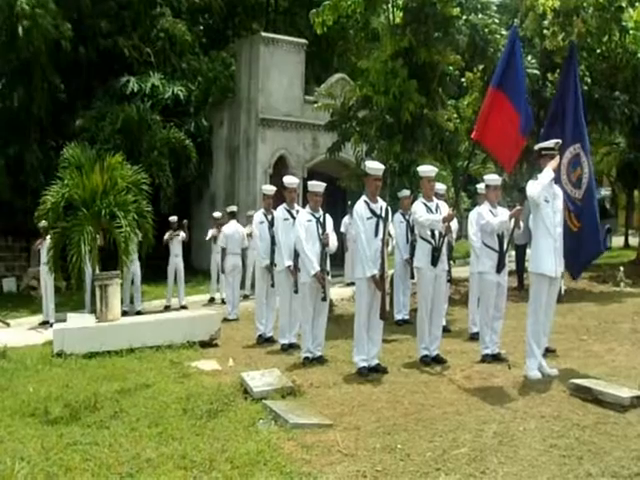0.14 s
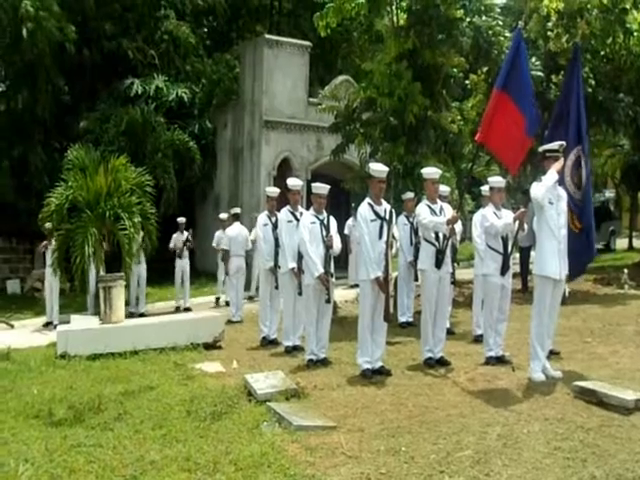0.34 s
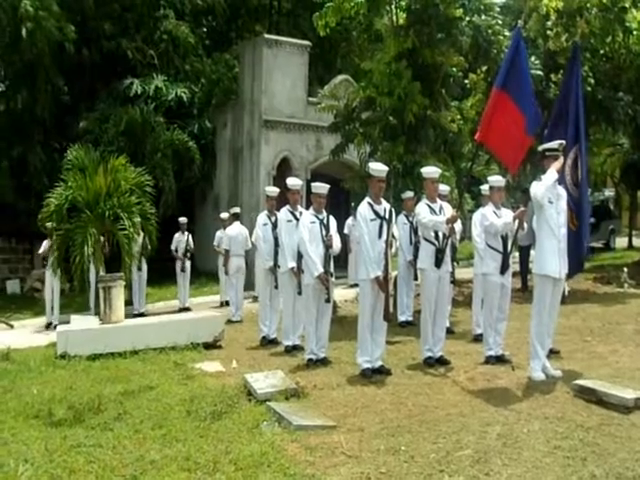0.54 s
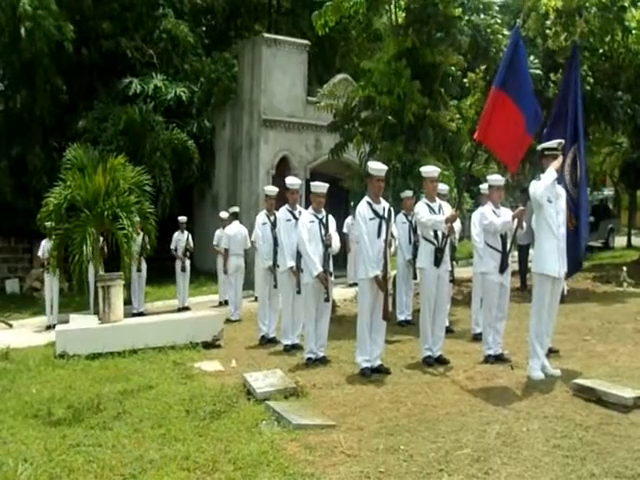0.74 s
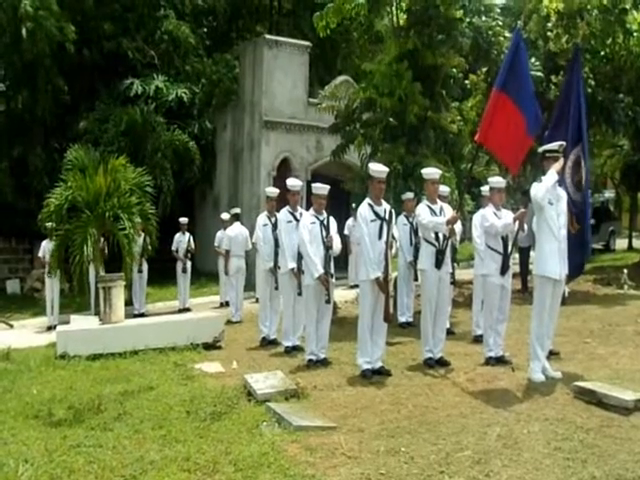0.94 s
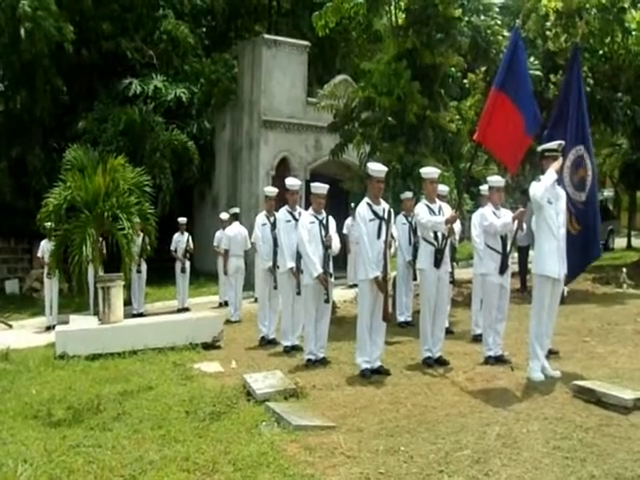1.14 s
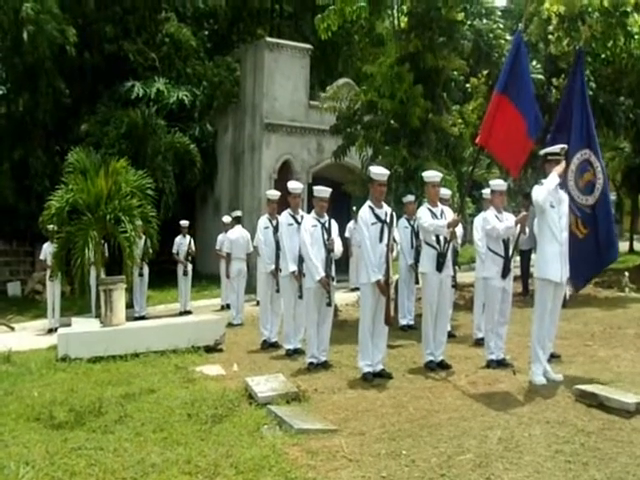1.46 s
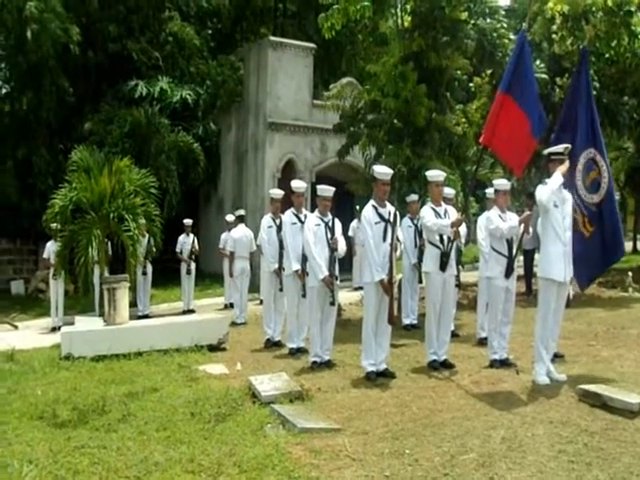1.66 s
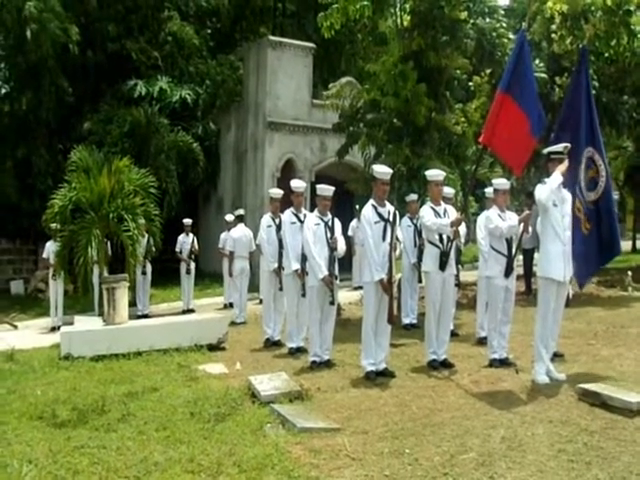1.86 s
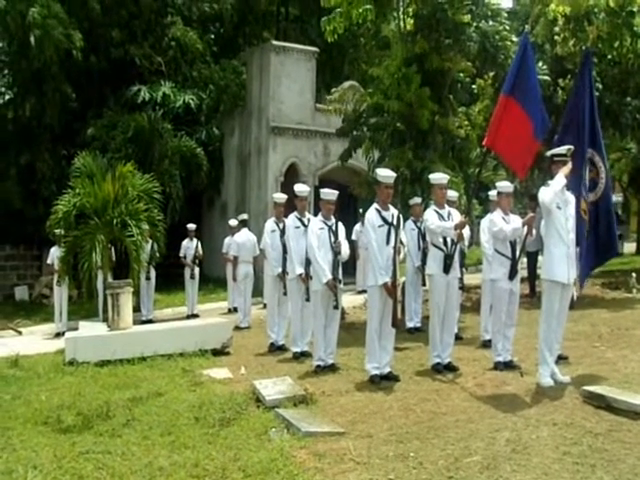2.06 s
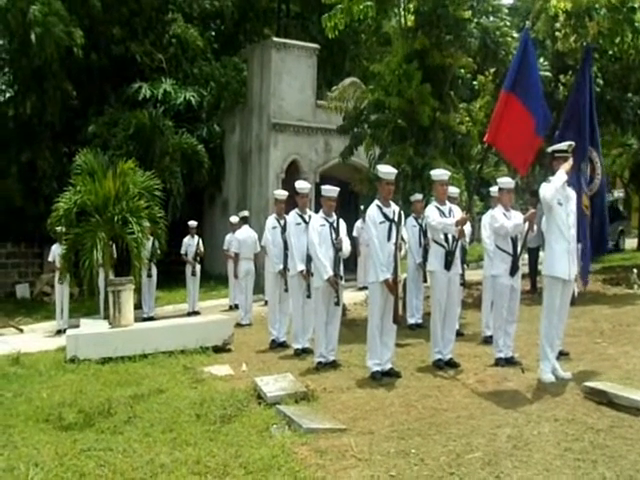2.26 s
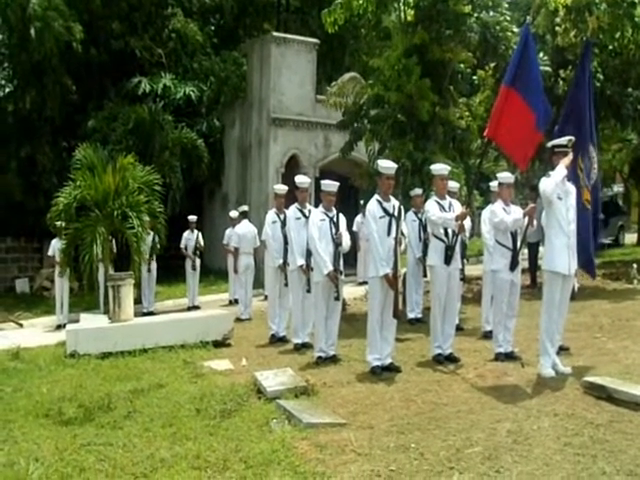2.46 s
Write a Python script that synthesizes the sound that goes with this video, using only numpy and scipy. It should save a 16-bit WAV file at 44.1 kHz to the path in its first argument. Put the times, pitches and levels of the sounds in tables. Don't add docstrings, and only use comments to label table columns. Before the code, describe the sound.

Quiet outdoor air with a faint cricket, a tiny click at 0.2 seconds, then at once three rifle blanks within about 0.05 seconds, loud and clipped. Short slaps return from 0.33 to 0.55, with a tree-line wash and dull distant echoes dying away. Steel bolts clack at 1.0 to 1.15, strongest near 1.08. Soft bird pips follow at 1.56 and 1.73, over low traffic rumble, leaves and thin crickets until 2.6.

```python
import sys
import numpy as np
from scipy import signal
from scipy.fft import rfft, irfft, next_fast_len
from scipy.io import wavfile
from scipy.ndimage import map_coordinates

SR = 44100
rng = np.random.default_rng(int(sys.argv[2]) if len(sys.argv) > 2 else 0)


def voltage_ratio(decibels):
    exponent = np.asarray(decibels, float) / 20
    return 10 ** exponent


def unload_audio(sound):
    columns = np.transpose(np.atleast_2d(sound))
    steps = np.round(np.clip(columns, -1, 1) * 32767)
    wavfile.write(sys.argv[1], SR, steps.astype(np.int16))


N = 114660

# start_s, strength_db, push_s (pressure push length), near_db (near wall scatter, rms)
SHOT_LIST = [
    (.2076, 6, .0026, -6.5),
    (.2186, 3, .003, -7.5),
    (.2497, 2, .0022, -11),
    (.2672, -7, .001, -19),
]
# freq_hz, density_db (per Hz)
TREE_COLOUR = [(24, -51), (40, -26), (97, -5), (318, -2.5), (510, -8), (851, -0.5), (1610, -8), (4770, -5),
               (5400, -8.5), (7020, -44.5), (11900, -120)]
# time_s, pitch_hz
CRICKET_PITCH = [(0, 4295), (1.2, 4320), (1.4, 4235), (1.7, 4290), (2, 4310), (2.6, 4310)]


def unit(x):
    return x / np.sqrt(np.mean(x ** 2) + 1e-20)


def along(points, hz):
    f, v = np.transpose(points)
    return np.interp(np.log(hz + 1), np.log(f + 1), v)


def wobble(rate):
    knots = rng.standard_normal(int(N * rate / SR) + 4)
    return map_coordinates(knots, [np.arange(N) * rate / SR])


def filtered(x, response):
    m = next_fast_len(N + SR // 2)
    return irfft(rfft(x, m) * response(np.fft.rfftfreq(m, 1 / SR)), m)[..., :N]


def coloured(noise, spectrum):
    return unit(filtered(noise, lambda f: voltage_ratio(along(spectrum, f))))


def add(out, s, piece):
    start = max(round(s * SR), 0)
    out[start:start + len(piece)] += piece[:len(out) - start]


def scatter(spectrum, t60, rise_s, hold_s, lumpy_db):
    grit = coloured(rng.standard_normal(N) * voltage_ratio(lumpy_db * wobble(250)), spectrum)
    hz, t, z = signal.stft(grit, SR, nperseg=256)
    decay_s = np.maximum(t - rise_s - hold_s, 0)
    z = z * voltage_ratio(-60 * decay_s / along(t60, hz)[:, None])
    fading = signal.istft(z, SR, nperseg=256)[1]
    return fading[:N] * np.clip(np.arange(N) / SR / rise_s, 0, 1)


def muzzle_blasts():
    crack_db, crack_t60 = -1.5, 0.0094
    out, t = np.zeros(N), np.arange(SR // 20) / SR
    for s, db, push_s, _ in SHOT_LIST:
        u = t / push_s
        push = (1 - u) * np.exp(-1.5 * u * u)
        crack = voltage_ratio(crack_db - 60 * t / crack_t60) * rng.standard_normal(len(t))
        add(out, s, voltage_ratio(db) * (push + crack))
    return out


def near_walls():
    # freq_hz, density_db (per Hz)
    wall_colour = [(24, -34), (40, -9.5), (340, -11), (520, -14), (784, -3.5), (1750, -10.5), (4220, -10),
                   (5400, -12), (7000, -43)]
    # freq_hz, t60_s
    wall_decay = [(100, .14), (400, .2), (900, .25), (2000, .28), (4500, .3)]
    out = np.zeros(N)
    for s, _, _, near_db in SHOT_LIST:
        add(out, s, voltage_ratio(near_db) * scatter(wall_colour, wall_decay, rise_s=.004, hold_s=0, lumpy_db=1))
    return out


def tree_line():
    # freq_hz, t60_s
    tree_decay = [(60, 0.65), (250, 1), (900, 0.93), (2000, 0.81), (5000, 0.64)]
    level_db, delay_s = -25, .09
    out = np.zeros(N)
    for s, db, _, _ in SHOT_LIST:
        wash = scatter(TREE_COLOUR, tree_decay, rise_s=0.036, hold_s=0.086, lumpy_db=1.0)
        add(out, s + delay_s, voltage_ratio(db / 2 + level_db) * wash)
    return out


def far_buildings():
    # freq_hz, density_db (per Hz)
    far_colour = [(100, -9.5), (400, -8.5), (750, 0.5), (1050, 0), (1400, -8), (4000, -18), (5500, -23)]
    # freq_hz, t60_s
    far_decay = [(300, 1), (1000, 0.72), (3000, 1)]
    level_db, delay_s = -45, .49
    out = np.zeros(N)
    for s, db, _, _ in SHOT_LIST:
        wash = scatter(far_colour, far_decay, rise_s=0.023, hold_s=0.099, lumpy_db=2.0)
        add(out, s + delay_s, voltage_ratio(db / 2 + level_db) * wash)
    return out


def slaps():
    # start_s, level_db, t60_s
    slap_list = [
        (0.327, -21, 0.025),
        (.348, -15, 0.066),
        (0.393, -22, .02),
        (.397, -14, .02),
        (0.412, -11, 0.018),
        (.431, -11.5, 0.013),
        (.446, -14, 0.015),
        (0.489, -31, 0.0069),
        (0.526, -28.5, 0.011),
        (.555, -29, 0.012),
    ]
    out, t = np.zeros(N), np.arange(SR // 20) / SR
    grit = coloured(rng.standard_normal(N), TREE_COLOUR)
    for s, db, t60 in slap_list:
        add(out, s, voltage_ratio(db - 60 * t / t60) * grit[round(s * SR):][:len(t)])
    return out


def bolts():
    # start_s, peak_db, struck_hz (pitch of the part that is struck)
    click_list = [(0.2001, -37, 4900), (1.0017, -39.5, 5400), (1.003, -44, 3000), (1.02, -44.5, 5400),
                  (1.034, -49, 5400), (1.043, -47, 4000), (1.082, -28, 3050), (1.0822, -29.5, 4950),
                  (1.0835, -34, 2100), (1.096, -38, 2350), (1.111, -39, 4270), (1.114, -34, 4000),
                  (1.1144, -41, 2420), (1.127, -40, 4480), (1.1317, -42, 4680), (1.147, -43, 4460)]
    # pitch_hz, level_db, t60_s
    bolt_modes = [(1860, -4.5, 0.044), (2374, -1.5, 0.052), (3050, 2.5, 0.014), (3680, 1.5, .025),
                  (4375, -1.5, .03), (4950, 1.5, 0.034), (5400, -7, .03)]
    # freq_hz, density_db (per Hz)
    rattle_colour = [(1000, -35), (1800, -7), (3000, -8), (5000, -2)]
    spread_db, detune = -7, .03
    rattle_db, rattle_t60 = -10, .05
    struck_db, struck_t60 = -5, .03
    room_db, room_t60 = -6, .22
    out, t = np.zeros(N), np.arange(SR // 5) / SR
    grit = coloured(rng.standard_normal(N), rattle_colour)
    for s, db, struck_hz in click_list:
        ring = np.zeros(len(t))
        for hz, mode_db, t60 in bolt_modes:
            level_luck, pitch_luck = rng.standard_normal(2)
            start_db = mode_db + 3.8 * level_luck + spread_db * abs(np.log2(hz / struck_hz))
            ring += voltage_ratio(start_db - 60 * t / t60) * np.sin(2 * np.pi * hz * (1 + detune * pitch_luck) * t)
        rattle = voltage_ratio(rattle_db - 60 * t / rattle_t60) * grit[round(s * SR):][:len(t)]
        struck = voltage_ratio(struck_db - 60 * t / struck_t60) * np.sin(2 * np.pi * struck_hz * t)
        onset = 1 - np.exp(-t / 0.00048)
        add(out, s, voltage_ratio(db) * (voltage_ratio(-8) * ring + rattle + struck) * onset)
    tail = rng.standard_normal(len(t)) * voltage_ratio(-60 * t / room_t60) * np.clip(t / .01, 0, 1)
    return out + voltage_ratio(room_db) * signal.fftconvolve(out, tail / np.linalg.norm(tail))[:N]


def note(hz, fall_hz, length_s):
    t = np.arange(round(length_s * SR)) / SR - length_s / 2
    swell = np.sqrt(2) * np.cos(np.pi * t / length_s) ** 2
    return swell * np.sin(2 * np.pi * (hz * t - fall_hz * t * t / 2))


def cricket():
    # middle_s, level_db
    chirp_list = [(.03, -70), (.07, -70), (.105, -68), (.17, -67), (1.225, -67), (1.315, -66), (1.42, -67),
                  (1.465, -66), (1.58, -69), (1.625, -66), (1.67, -67), (1.73, -64), (1.79, -67),
                  (1.978, -64), (2.105, -69), (2.163, -64), (2.228, -64), (2.295, -64), (2.358, -65),
                  (2.445, -69), (2.495, -64), (2.565, -64)]
    chirp_s = 0.043
    out = np.zeros(N)
    for s, db in chirp_list:
        hz = np.interp(s, *np.transpose(CRICKET_PITCH)) * (1 + 0.0017 * rng.standard_normal())
        add(out, s - chirp_s / 2, voltage_ratio(db) * note(hz, 600, chirp_s))
    return out


def bird():
    # middle_s, level_db, pitch_hz, fall_hz_per_s
    pip_list = [
        (1.559, -51, 1910, 3000),
        (1.732, -54, 1940, 6000),
    ]
    pip_s = 0.023
    out = np.zeros(N)
    for s, db, hz, fall_hz in pip_list:
        add(out, s - pip_s / 2, voltage_ratio(db) * note(hz, fall_hz, pip_s))
    return out


def chorus():
    # time_s, level_db
    chorus_level = [(0, -69), (.2, -70), (1.2, -70), (1.8, -71), (1.9, -77), (2.6, -78)]
    t = np.arange(N) / SR
    hz = np.interp(t, *np.transpose(CRICKET_PITCH)) + 20 * wobble(40)
    phase = 2 * np.pi * np.cumsum(hz) / SR
    db = np.interp(t, *np.transpose(chorus_level)) + 2.3 * wobble(18)
    return voltage_ratio(db) * np.sqrt(2) * np.sin(phase)


def air():
    # freq_hz, density_db (per Hz)
    air_colour = [(8.8, -35.5), (15, 1), (119, -8), (303, -13.5), (1430, -26), (1920, -28), (3830, -33.5),
                  (4220, -31.5), (5400, -38.5), (7020, -71.5), (11900, -120)]
    # time_s, level_db
    air_level = [(0, -44.5), (0.199, -44.5), (1.2, -43), (2, -44.5), (2.6, -44)]
    hush = coloured(rng.standard_normal(N), air_colour)
    bass = filtered(hush, lambda f: 1 / (1 + (f / 150) ** 4))
    mix = bass * voltage_ratio(1.3 * wobble(9)) + (hush - bass) * voltage_ratio(0.58 * wobble(3.9))
    return voltage_ratio(np.interp(np.arange(N) / SR, *np.transpose(air_level))) * mix


def scene():
    shots = muzzle_blasts() + near_walls() + tree_line() + far_buildings() + slaps()
    return (shots + bolts() + cricket() + bird() + chorus() + air())[None]


def band_limit(x):
    return signal.sosfilt(signal.butter(12, 7360, fs=SR, output="sos"), x)


def record(dry):
    # freq_hz, gain_db
    input_band = [(4800, -0.5), (5300, -3), (5500, -8), (5700, -39)]
    # freq_hz, gain_db
    output_band = [(4500, -1.5), (5500, -1.5), (6300, -18), (6900, -38), (7300, -60.5), (7600, -81.5)]
    ceiling, hardness, skip, hiss_db = .58, 10, 4, -100
    kept = filtered(dry, lambda f: voltage_ratio(along(input_band, f)) * 1j * f / (12 + 1j * f))
    clipped = kept / (1 + np.abs(kept / ceiling) ** hardness) ** (1 / hardness)
    sparse = skip * clipped * (np.arange(N) % skip == 0)
    narrow = filtered(sparse, lambda f: voltage_ratio(along(output_band, f)) * (f < 9000))
    mix = narrow + voltage_ratio(hiss_db) * rng.standard_normal(N)
    return band_limit(mix)


dry = scene()
out = record(dry)
unload_audio(out)
```